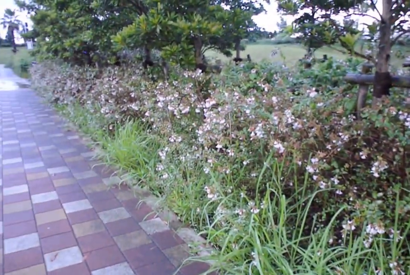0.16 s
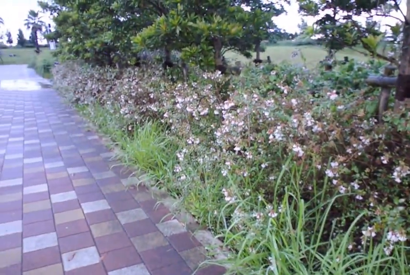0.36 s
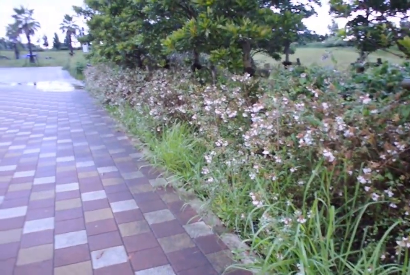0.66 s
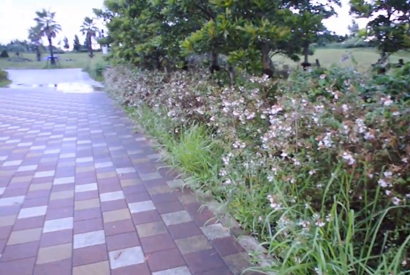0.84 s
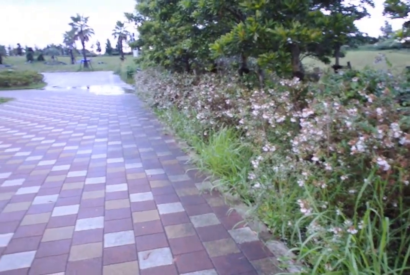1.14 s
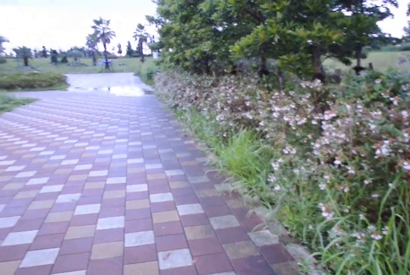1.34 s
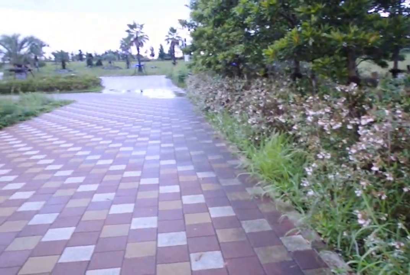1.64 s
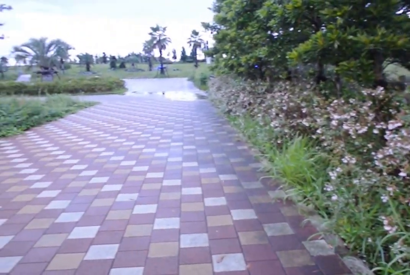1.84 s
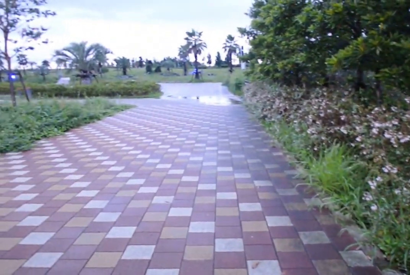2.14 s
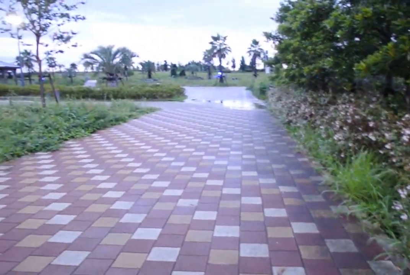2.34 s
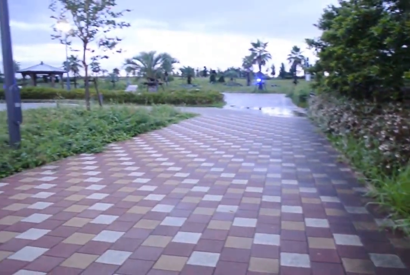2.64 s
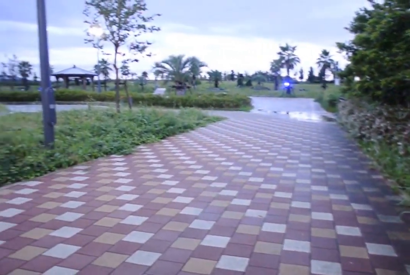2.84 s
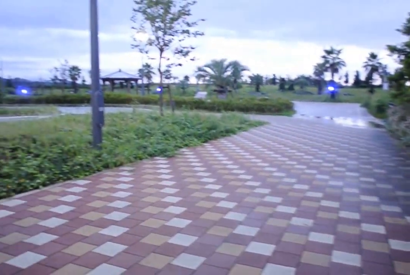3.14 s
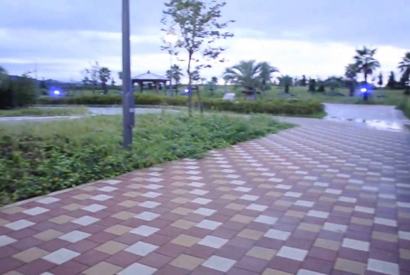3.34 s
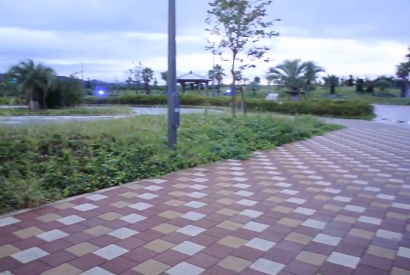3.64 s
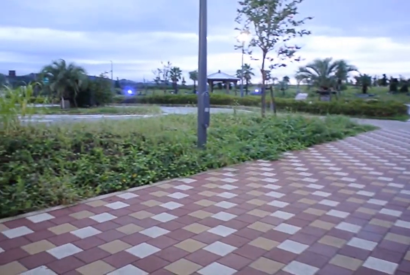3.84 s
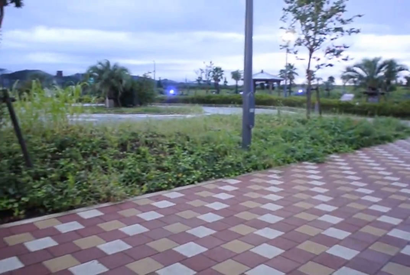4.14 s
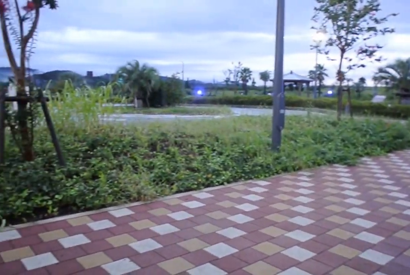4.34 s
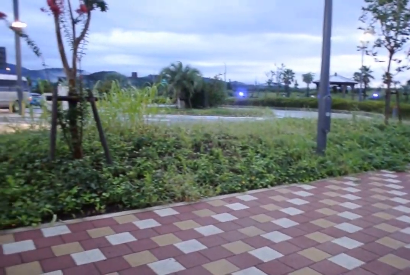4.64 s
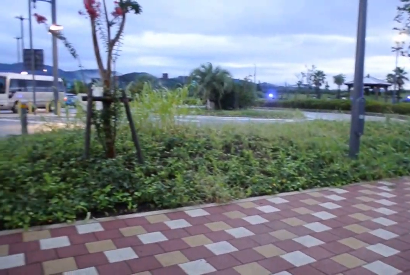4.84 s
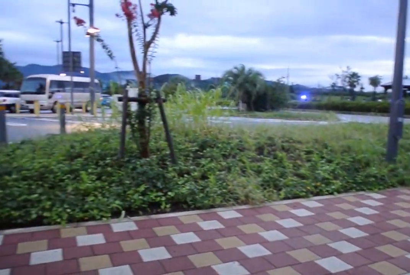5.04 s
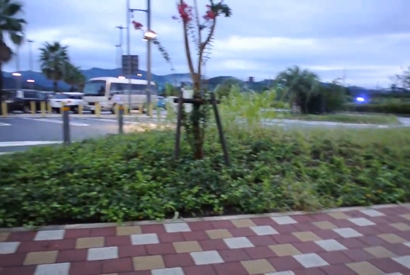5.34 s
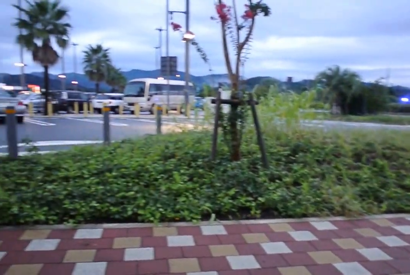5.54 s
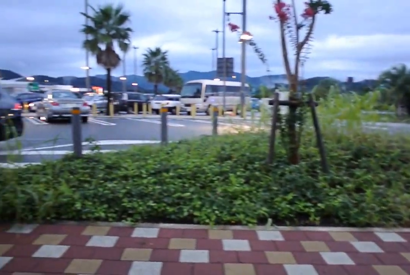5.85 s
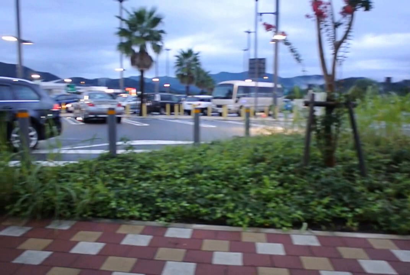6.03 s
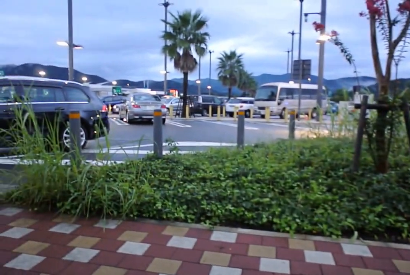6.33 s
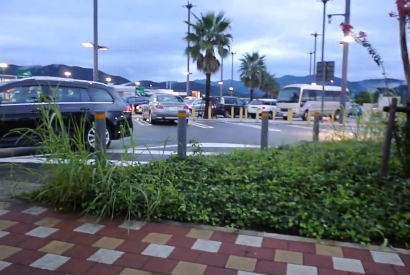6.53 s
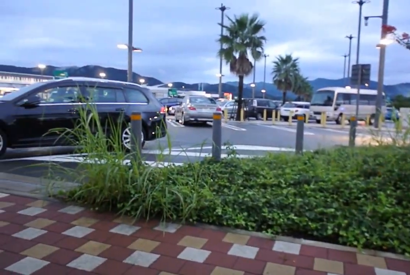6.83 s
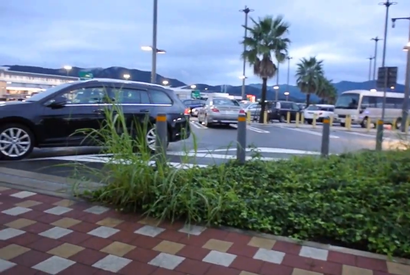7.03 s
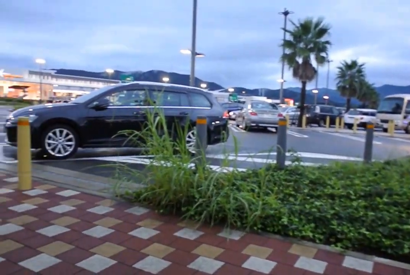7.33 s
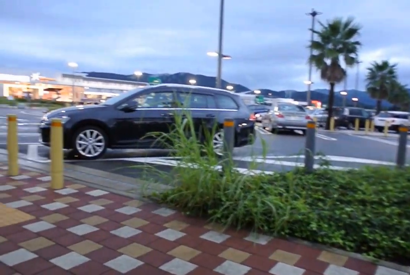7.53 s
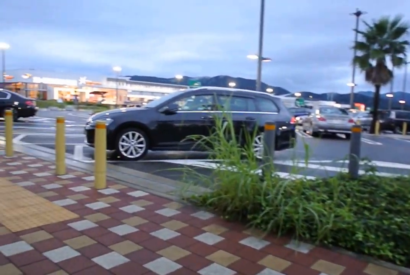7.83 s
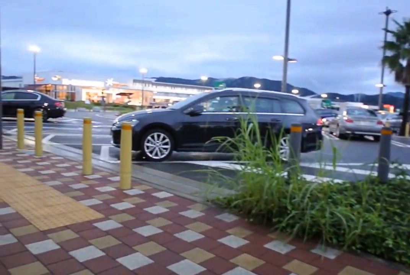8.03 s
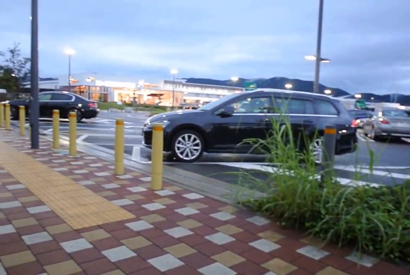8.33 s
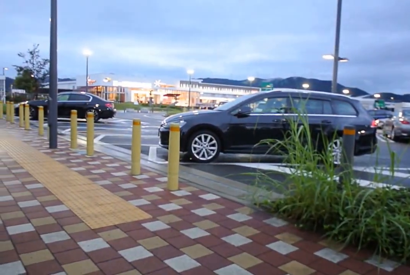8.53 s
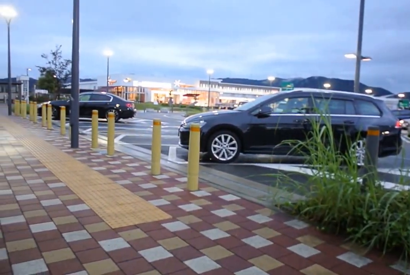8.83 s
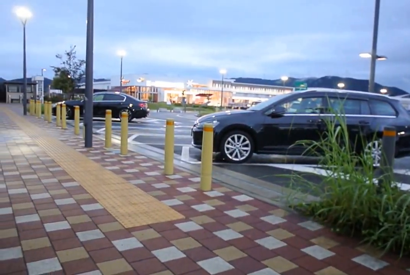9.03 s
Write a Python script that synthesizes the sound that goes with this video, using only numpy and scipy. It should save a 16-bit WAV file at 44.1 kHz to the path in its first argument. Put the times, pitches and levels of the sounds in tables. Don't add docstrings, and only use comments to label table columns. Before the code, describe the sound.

At dusk by a park hedge, a bell cricket sings close and central from the start: silvery tones near 4.6 kHz, about 26 pulses a second, in phrases of 0.2 to 0.3 seconds, each starting slightly lower and softer. A quieter neighbour answers in some gaps, with a far chorus and a thin, faint ground-cricket trill behind. Soft hand rustles occur until about 3.6 s. The close singer ends near 3.1 s; as the microphone swings towards a car park, many softer singers overlap until the end at 9.2 s, slightly different in pitch and position, some leaning left, later others right. Higher pine-cricket whistles near 5.6 kHz come faintly around 2.8 to 3.8 s and more clearly from 7.0 to 7.9 s. Leaf hiss fades a little; distant traffic rumble, tyre hiss and engine hum stay faint, the hum swelling near 5 s.

```python
import sys
import numpy as np
from scipy import signal
from scipy.fft import rfft, irfft, next_fast_len
from scipy.io import wavfile
from scipy.ndimage import uniform_filter1d

SR = 44100
rng = np.random.default_rng(int(sys.argv[2]) if len(sys.argv) > 2 else 0)


def put_to_file(sound):
    columns = np.atleast_2d(sound).T
    safe = np.clip(columns, -1, 1)
    whole_steps = np.round(safe * 32767)
    wavfile.write(sys.argv[1], SR, whole_steps.astype(np.int16))


def to_linear_factor(level_db):
    exponent = np.asarray(level_db, float) / 20
    return 10 ** exponent


N = 404838


def rms_one(x):
    return x / np.sqrt(np.mean(x ** 2) + 1e-20)


def in_time(rows):
    s, *columns = np.transpose(rows)
    return [np.interp(np.arange(N) / SR, s, c) for c in columns]


# time in seconds, aim from 0 (hedge) to 1 (car park).
AIM_CURVE = [(0, 0.016), (3, 0.48), (6, 0.95), (9.18, 0.89)]


def aim():
    return in_time(AIM_CURVE)[0]


# pitch in Hz, likeness from -1 (opposite) to 1 (same).
EAR_LIKENESS = [(60, 1), (250, 0.95), (700, 0.86), (1500, 0.73), (3000, 0.25), (6000, -0.32), (9000, -0.41),
                (11000, -0.0073), (15000, 0.66)]


def shaped_noise(spectrum):
    size = next_fast_len(N)
    log_hz = np.log(np.arange(1, size // 2 + 2) * SR / size)
    hz, db = np.transpose(spectrum)
    gain = to_linear_factor(np.interp(log_hz, np.log(hz), db))
    hz, likeness = np.transpose(EAR_LIKENESS)
    alike = np.clip(np.interp(log_hz, np.log(hz), likeness), -1, 0.98)
    mid, side = rfft(rng.standard_normal((2, size))) * gain
    both = np.sqrt(1 + alike) * mid + np.sqrt(1 - alike) * side * [[1], [-1]]
    return rms_one(irfft(both, size)[:, :N])


def narrow_noise(hz, width_hz):
    band = signal.butter(2, [hz - width_hz / 2, hz + width_hz / 2], "band", fs=SR, output="sos")
    return rms_one(signal.sosfilt(band, rng.standard_normal(N + SR))[SR:])


def tones(start, length, hz, sag_hz, db, pan_db, lag, partials_db, swell, lean, wobble):
    out = np.zeros((2, N + SR))
    step = np.arange(int(np.max(length) * SR))
    t, span = step / SR, length[:, None]
    u = np.clip(t / span, 0, 1)
    chance = rng.random((len(start), 5))
    slips = 0
    for k in range(2):
        slip_hz = 40 + 110 * chance[:, [k]]
        slips = slips + np.sin(2 * np.pi * (slip_hz * t + chance[:, [k + 2]]))
    turns = hz[:, None] * t - sag_hz[:, None] * span * u ** 3 / 3 + chance[:, [4]]
    shape = np.abs(np.sin(np.pi * u ** lean)) ** swell * (u < 1)
    spin = np.exp(1j * (2 * np.pi * turns + wobble * slips))
    start_sample = np.round(np.clip(start, 0, N / SR) * SR).astype(int)
    at = (start_sample[:, None] + step).ravel()
    for ear, sign in enumerate([1, -1]):
        late = np.exp(-1j * np.pi * sign * lag * hz / SR)[:, None]
        partial = shape * (1 + wobble * slips[::-1])
        wave = 0
        for partial_db in partials_db:
            partial = partial * spin * late
            wave = wave + to_linear_factor(partial_db) * partial.imag
        level = to_linear_factor(db + sign * pan_db / 2)[:, None]
        out[ear] = np.bincount(at, (wave * level).ravel(), N + SR)
    return out[:, :N]


# time in seconds, samples by which left lags right.
HEDGE_LAG = [(0, 2.5), (3, 2.5), (5, 3), (6.3, 3), (6.8, -3.5), (7.6, -2.5), (9.18, -2.5)]


def strokes(s, hz, db, pan_db, partials_db, scatter, wobble, sag_hz):
    lag = np.interp(s, *np.transpose(HEDGE_LAG)) + scatter * rng.standard_normal(len(s))
    one = np.ones(len(s))
    flick = tones(s + 0.007, 0.0087 * one, hz - 260, 480 * one, db - 17, pan_db * one, lag,
                  [0], swell=0.88, lean=0.8, wobble=0.045)
    ring = tones(s - 0.013, 0.02604 * one, hz + sag_hz / 4, sag_hz * one, db, pan_db * one, lag,
                 partials_db, swell=1.4, lean=0.95, wobble=wobble)
    return flick + ring


def unroll(phrases, beat):
    rows = []
    for first, last, first_hz, last_hz, db in phrases:
        for u in np.linspace(0, 1, round((last - first) / beat) + 1):
            age = (last - first) * u
            rows.append((first + age, age, first_hz + (last_hz - first_hz) * u, db))
    return np.transpose(rows)


# first stroke in seconds, last stroke in seconds, peak level in dB.
CLOSE_PHRASES = [
    (-0.125, 0.03, -10),
    (0.262, 0.452, -7.5),
    (0.639, 0.864, -8),
    (1.04, 1.229, -7.5),
    (1.427, 1.735, -8.5),
    (1.913, 2.177, -7.5),
    (2.388, 2.62, -8),
    (2.869, 3.058, -8.5),
]


def close_singer():
    hz, climb_hz, soft_start_db, settle_s, uneven_db = 4628, 179, 2.5, 0.059, 0.47
    beats = unroll([(first, last, hz, hz, db) for first, last, db in CLOSE_PHRASES], 0.0378)
    s, age, hz, db = beats[:, beats[0] > 0]
    early = np.exp(-age / settle_s)
    db = db - soft_start_db * early + uneven_db * rng.standard_normal(len(s))
    return strokes(s, hz - climb_hz * early, db, -0.24, [0, -31, -26], scatter=0.64, wobble=0.099, sag_hz=420)


# time in seconds, level in dB, left-right difference in dB.
CHORUS_LEVEL = [(0.0, -20.5, -2.5), (0.74, -27, -4), (2.56, -23, 0), (3.43, -27, 1), (3.78, -24.5, -2),
                (5.47, -24, 1.5), (8.31, -20.5, 2), (9.18, -24.5, 6)]


def chorus():
    rows = []
    for k, (beat, pause, size) in enumerate(rng.random((12, 3))):
        s = np.arange(-pause, N / SR, 0.035 + 0.003 * beat)
        place = np.arange(len(s)) % int(12 + 10 * size)
        rise = np.exp(-place / 1.47)
        sung = (place < 8 + 8 * size) & (s > 0)
        hz = 4250 + 430 * ((k + 1) / 12) ** 0.611 - 200 * rise
        pan_db = 6 * (beat - 0.5) + 0 * s
        rows.append(np.array([s, hz, -8 * rise + 3 * pause, pan_db])[:, sung])
    level_db, pan_db = in_time(CHORUS_LEVEL)
    crowd = strokes(*np.hstack(rows), [0, -33, -27], scatter=1.71, wobble=0.059, sag_hz=308)
    loudness = uniform_filter1d(np.mean(crowd ** 2, axis=0), SR // 8)
    return crowd / np.sqrt(loudness + 1e-9) * to_linear_factor(level_db - 0.8 + pan_db * [[0.5], [-0.5]])


# time in seconds, level in dB.
TRILL_LEVEL = [(0, -44), (1.5, -47.5), (3, -48.5), (5.4, -54), (5.8, -60), (9.18, -70)]


def ground_cricket():
    s = np.cumsum(1 / 53.6 + 0.00032 * rng.standard_normal(int(53 * N / SR)))
    one = np.ones(len(s))
    trill = tones(s, 0.013 * one, 5270 * one, 150 * one, 2.8 * rng.standard_normal(len(s)), -1.5 * one,
                  1.4 * one, [0], swell=0.65, lean=1.0, wobble=0.11)
    return rms_one(trill) * to_linear_factor(in_time(TRILL_LEVEL)[0])


# time in seconds, level in dB.
SHIMMER_LEVEL = [(0, -50), (3, -61), (4.5, -62), (6, -56.5), (9.18, -54)]


def far_shimmer():
    shimmer = np.array([narrow_noise(7050, 450), narrow_noise(7020, 410)])
    return shimmer * to_linear_factor(in_time(SHIMMER_LEVEL)[0])


# pitch in Hz, level in dB per Hz.
LEAF_SPECTRUM = [(3500, -31), (5000, -8), (5600, 6), (6400, -10.5), (8000, 4.5), (9400, 1.5), (9700, -43)]


def leaves():
    return shaped_noise(LEAF_SPECTRUM) * to_linear_factor(-41 - 5.5 * aim())


# pitch in Hz, level in dB per Hz.
RUMBLE_SPECTRUM = [(12, -41), (20, -12), (59, -3), (97, -5.5), (129, -2), (173, -2.5), (208, -1), (278, -6),
                   (315, -6.5), (362, -10.5), (400, -15), (520, -35), (880, -120)]


def traffic_rumble():
    return shaped_noise(RUMBLE_SPECTRUM) * to_linear_factor(-44.5 + 2 * aim())


# pitch in Hz, level in dB per Hz.
HISS_SPECTRUM = [(250, -34), (400, -3.5), (550, 1), (1000, -3.5), (2600, -7.5), (3500, -8.5), (5000, -4.5),
                 (9800, -16.5), (10500, -15), (14000, -17.5), (14400, -13), (16000, -30)]


def tyre_hiss():
    return shaped_noise(HISS_SPECTRUM) * to_linear_factor(-40 + 3 * aim())


# loudest moment in seconds, pitch in Hz, width in Hz, peak level in dB, half length in seconds.
ENGINES = [
    (2.66, 129.4, 20, -44, 0.23),
    (0.64, 127.7, 20, -55.5, 1.5),
    (6.9, 126.5, 18, -54.5, 3.1),
    (2.5, 212.4, 24, -48, 1.66),
    (5.06, 209.8, 24.5, -43.5, 1.07),
    (9.1, 212, 20, -48.5, 1.35),
    (1.9, 314, 7.1, -55, 2.1),
    (7.1, 314, 7.9, -56, 1.4),
    (7.8, 1284, 15, -55, 2.4),
]


def engine_whines():
    t, out = np.arange(N) / SR, np.zeros(N)
    for s, hz, width_hz, db, half_s in ENGINES:
        out += narrow_noise(hz, width_hz) * to_linear_factor(db) / (1 + ((t - s) / half_s) ** 2)
    return out


# first stroke in seconds, last stroke in seconds, first pitch in Hz, last pitch in Hz, peak level in dB.
NEIGHBOUR_PHRASES = [
    (0.098, 0.239, 4490, 4490, -16),
    (0.495, 0.531, 4490, 4480, -12.5),
    (1.369, 1.474, 4460, 4500, -13),
    (1.765, 1.872, 4510, 4490, -18),
    (2.21, 2.355, 4490, 4510, -18.5),
    (2.688, 2.833, 4460, 4480, -16),
]
OTHER_PHRASES = [(3.114, 3.36, 4450.0, 4540, -19), (3.4, 3.828, 4390, 4500.0, -16),
                 (3.596, 3.848, 4560, 4586, -21), (3.659, 4.087, 4190, 4150.0, -20),
                 (3.879, 4.306, 4460, 4630, -18.5), (4.093, 4.408, 4370, 4470, -18),
                 (4.13, 4.457, 4203, 4280, -16.5), (4.35, 4.802, 4550, 4600, -16.5),
                 (4.786, 5.118, 4454, 4550, -21), (4.81, 5.243, 4204, 4310, -20.5),
                 (4.957, 5.252, 4400, 4550.0, -21), (5.282, 5.547, 4290, 4460, -24),
                 (5.293, 5.725, 4540, 4620, -17), (5.8, 6.248, 4605, 4600.0, -16),
                 (5.848, 6.248, 4150, 4350, -22.8), (6.288, 6.718, 4290, 4390, -23.5),
                 (6.391, 6.819, 4650.0, 4665, -23.5), (6.857, 7.122, 4550, 4660, -17.5),
                 (7.177, 7.449, 4590, 4650.0, -25), (7.321, 7.607, 4400.0, 4506, -21),
                 (7.481, 7.921, 4636, 4650.0, -17.5), (8.015, 8.438, 4600.0, 4660, -19.0),
                 (8.645, 9.08, 4463, 4480, -17.5), (8.71, 9.108, 4690, 4675.0, -22)]
# time in seconds, left-right difference in dB.
HEDGE_PAN = [(0, 0), (3.1, -1), (4.4, -4), (5.5, -5), (6.6, -3), (7.7, 2.5), (9.18, 2.5)]


def other_singers():
    s, _, hz, db = unroll(NEIGHBOUR_PHRASES + OTHER_PHRASES, 0.037)
    pan_db = np.interp(s, *np.transpose(HEDGE_PAN))
    return strokes(s, hz, db - 0.8, pan_db, [0, -36, -31], scatter=0.58, wobble=0.039, sag_hz=330)


# time in seconds, peak level in dB.
HAND_SHIFTS = [
    (0.3691, -43),
    (0.6494, -42),
    (0.7821, -56),
    (1.0794, -42),
    (1.502, -42),
    (2.14, -42),
    (2.9801, -39),
    (3.0475, -56),
    (3.6162, -40),
]


def rustles():
    t, gain = np.arange(N) / SR, np.zeros(N)
    for s, db in HAND_SHIFTS:
        gain += to_linear_factor(db + 11.5) * np.exp(-np.clip(t - s, 0, 1) / 0.017) * (t >= s)
    band = signal.butter(2, [900, 9000], "band", fs=SR, output="sos")
    return gain * signal.sosfilt(band, rng.standard_normal((2, N)))


# first pulse in seconds, last pulse in seconds, first pitch in Hz, last pitch in Hz, peak level in dB.
PINE_CALLS = [
    (2.823, 2.858, 5650, 5630, -31),
    (3.183, 3.278, 5660, 5400, -32.5),
    (3.465, 3.53, 5660, 5670, -36),
    (3.555, 3.69, 5680, 5670, -36.5),
    (3.59, 3.768, 5530, 5530, -26),
    (7.027, 7.06, 5630, 5570, -20),
    (7.395, 7.43, 5640, 5600, -21),
    (7.725, 7.915, 5630, 5740, -22.5),
    (7.962, 8.03, 5690, 5680, -37),
]


def pine_cricket():
    s, _, hz, db = unroll(PINE_CALLS, 0.034)
    one = np.ones(len(s))
    lag = np.where(s < 5, 8.0, -3.0)
    pan_db = np.where(s < 5, -0.8, 4.2)
    db = db + 2 * rng.standard_normal(len(s))
    return tones(s - 0.003, 0.038 * one, hz, 50 * one, db, pan_db, lag, [0, -17], swell=0.47, lean=0.46, wobble=0.03)


# first full stroke in seconds, last stroke in seconds,
# pitch in Hz, level of the third partial in dB, left-right difference in dB.
FACING_PHRASES = [
    (3.61, 3.83, 4500, -36, -0.1),
    (4.271, 4.482, 4420, -42, 6),
    (4.861, 5.184, 4490, -42, 1.7),
    (5.928, 6.221, 4370, -41.5, 10),
    (6.643, 6.997, 4400, -38, 6),
    (7.514, 7.83, 4400, -34.5, 3.5),
    (8.345, 8.663, 4400, -33.5, 3),
    (8.164, 8.306, 4625, -39, -1.7),
    (8.536, 8.707, 4630, -37.5, -1),
    (8.929, 9.042, 4665, -37, -3),
]


def facing_singers():
    rows = []
    for first, last, top_hz, top_db, pan_db in FACING_PHRASES:
        s, age, hz, db = unroll([(first - 0.143, last, top_hz, top_hz, top_db)], 0.0357)
        early = np.clip(1 - age / 0.16, 0, 1)
        rows.append(np.array([s, hz - 260 * early, db - 11 * early, pan_db + 0 * s]))
    return strokes(*np.hstack(rows), [9, -4, 1.5], scatter=0.57, wobble=0.037, sag_hz=150)


def foliage(x, t60, wet_db):
    t = np.arange(int(0.3 * SR)) / SR
    tail = rng.standard_normal((2, len(t))) * to_linear_factor(-60 * t / t60) * (t > 0.003)
    tail = tail / np.sqrt(np.sum(tail ** 2, axis=1, keepdims=True))
    return x + to_linear_factor(wet_db) * signal.fftconvolve(x, tail, axes=1)[:, :N]


def scene():
    bell_crickets = close_singer() + chorus() + other_singers() + facing_singers()
    song = foliage(bell_crickets, t60=0.056, wet_db=-9.5)
    whistles = foliage(pine_cricket(), t60=0.2, wet_db=-9)
    background = ground_cricket() + far_shimmer() + leaves()
    traffic = traffic_rumble() + tyre_hiss() + engine_whines()
    return song + whistles + background + traffic + rustles()


def roll_off(x):
    return signal.sosfilt(signal.butter(12, 16800, fs=SR, output="sos"), x)


def record(dry):
    top_cut = signal.ellip(12, 0.5, 70, 15780, fs=SR, output="sos")
    return roll_off(signal.sosfilt(top_cut, dry))


dry = scene()
out = record(dry)
put_to_file(out)
```